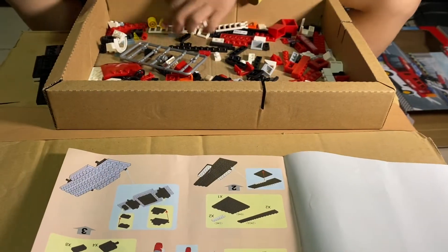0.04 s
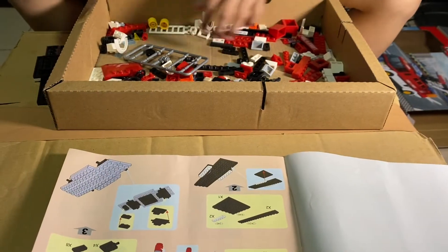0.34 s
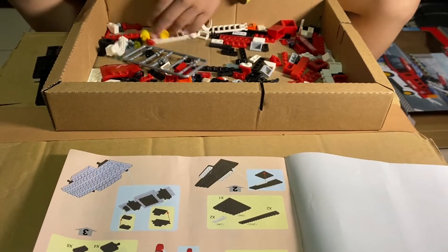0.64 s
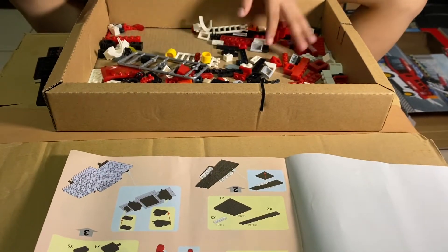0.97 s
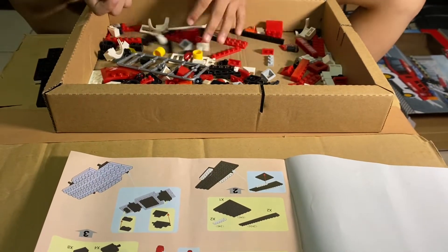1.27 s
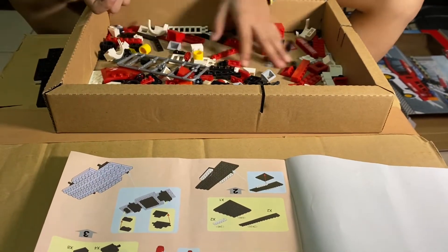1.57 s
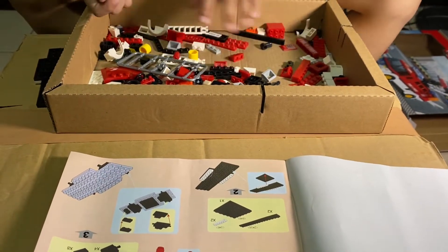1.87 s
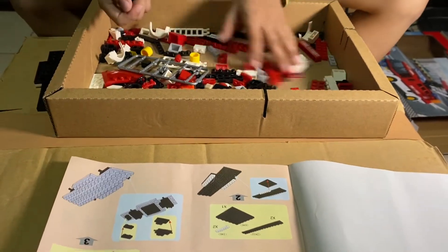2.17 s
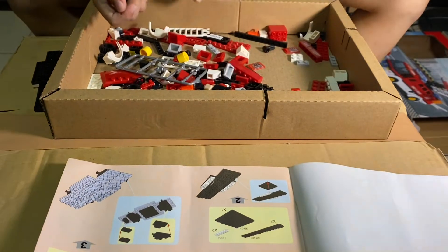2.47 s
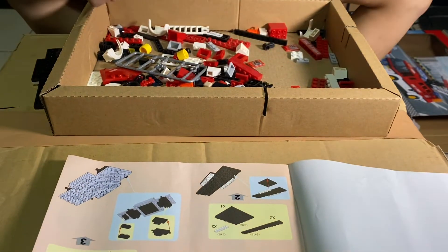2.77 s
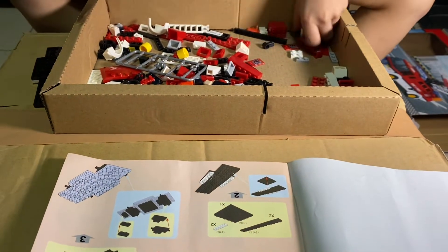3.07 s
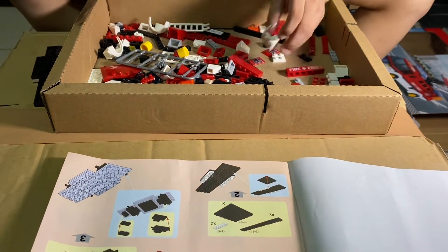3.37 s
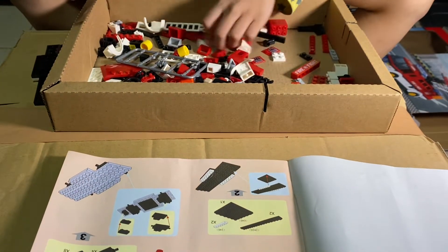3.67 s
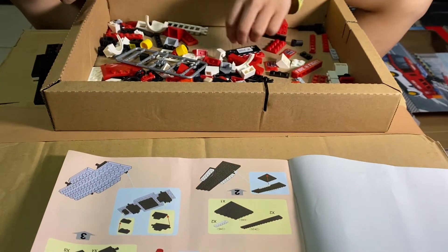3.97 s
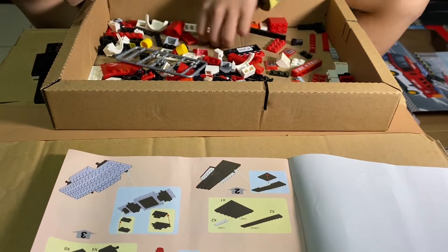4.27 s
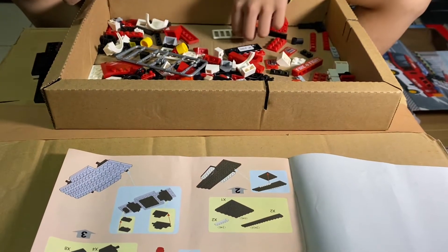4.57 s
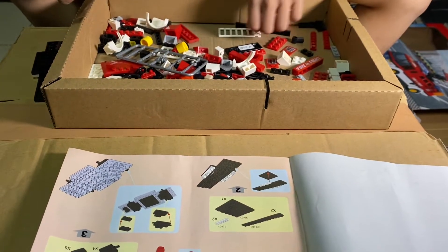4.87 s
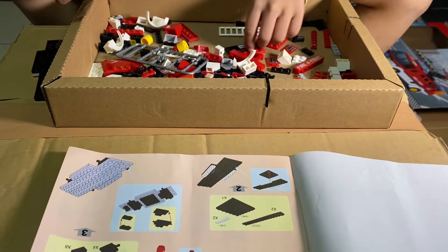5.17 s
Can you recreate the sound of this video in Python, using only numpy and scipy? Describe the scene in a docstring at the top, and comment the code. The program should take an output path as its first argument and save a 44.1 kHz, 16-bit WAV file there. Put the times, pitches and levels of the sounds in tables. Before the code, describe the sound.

A hand rummages through small plastic toy bricks in a cardboard box, making bursts of clicking, rattling and light knocks.

```python
"""A hand rummages through small plastic toy bricks in a shallow cardboard box, in a quiet room.
It starts with a run of short strokes: each contact clicks a brick and knocks the cardboard under it,
and a few small parts ring on. At 2.5 s the hand rests; at 3 s it drops onto the pile and stirs again.
From 4 s come weaker strokes, a firm knock and soft fingertip rubs, then one last tap just after 5 s.
Box walls and room answer throughout, heard through two close microphones."""
import sys
import numpy as np
from scipy import signal
from scipy.fft import rfft, irfft, next_fast_len
from scipy.io import wavfile

SR = 44100
rng = np.random.default_rng(int(sys.argv[2]) if len(sys.argv) > 2 else 0)


def digitize_waveform(pressure):
    """Quantize a signal to 16-bit integers and store it at the path in sys.argv[1].

    Rows of a 2-D input are taken as channels; values are limited to [-1, 1].
    """
    field = np.atleast_2d(pressure).T
    bounded = np.clip(field, -1, 1)
    quanta = np.round(bounded * 32767).astype(np.int16)
    wavfile.write(sys.argv[1], SR, quanta)


N = 230881

# The room's hush. Each row: frequency in Hz, level in dB.
HUSH_SPECTRUM = [(15, -34.5), (25, -14.5), (53, -7), (76, -9), (263, -24), (301, -16), (394, -22.5),
                 (1100, -30.5), (1400, -27.5), (1740, -34), (1940, -29.5), (2840, -38), (16000, -62.5)]
# The room's tail. Each row: frequency in Hz, t60 (time to fall 60 dB) in seconds.
ROOM_DECAY = [(150, 0.23), (500, 0.4), (1200, 0.34), (2700, 0.48), (7000, 0.35), (15000, 0.37)]
# The colour of the reverb. Each row: frequency in Hz, gain in dB.
REVERB_EQ = [(100, -3.5), (700, -4), (1300, 0.5), (2500, 4.5), (5000, -3.5), (9000, -6), (15000, -7)]
# The width of reverb and hush. Each row: frequency in Hz, left-right likeness (1 is mono).
DIFFUSE_LIKENESS = [(40, 0.86), (150, 0.91), (400, .8), (700, 1), (1200, 0.38), (1800, 0.14), (5500, 0.1),
                    (7500, 0.88), (15000, 0.93)]
# A fingertip brushes the cardboard. Each row: start and end in seconds, level in dB.
FINGER_RUBS = [(1.911, 1.989, -56), (2.923, 2.974, -71.5), (4.65, 4.699, -54.5), (4.702, 4.784, -56.5),
               (4.93, 4.939, -60)]
# Small parts bounce free and ring. Each row: start in seconds, pitch in Hz, level in dB, t60 in seconds.
RINGING_PARTS = [(0.276, 5940, -51.5, 0.38), (0.406, 5850, -45.5, .06), (0.560, 9900, -28.5, .04),
                 (0.579, 10340, -24, 0.022), (0.608, 10090, -27, 0.037), (1.08, 10350, -20.5, .03),
                 (1.195, 10230, -18.5, .025), (1.205, 10380, -18, 0.03), (1.228, 10450, -13.5, 0.026),
                 (1.339, 10400, -33, 0.022), (2.147, 7240, -23.5, 0.09), (3.125, 5500, -48.5, 0.7),
                 (4.737, 3890, -52, 0.15)]
# The cardboard floor's modes. Each row: pitch in Hz, level in dB, t60 in seconds.
FLOOR_MODES = [(119, -11, 0.058), (220, -4, 0.057), (300, -2.5, 0.056), (389.7, 1.5, 0.036),
               (495, -4, 0.023), (590, -3, .025), (696, -0.5, 0.037), (786, -3.5, 0.044),
               (1037, -1.5, 0.027), (1184, 0, 0.026), (1320, -3.5, 0.035)]
# The colour of a plastic click. Each row: frequency in Hz, gain in dB.
PLASTIC_EQ = [(600, -15), (1500, 0.5), (2200, 2), (3500, 1), (5000, -1.5), (6000, -6.5), (7300, -6),
              (9000, -10.5), (10400, -4.5), (11300, -12.5), (13500, -13), (15700, -16)]
# Single hard contacts. Each row: time in seconds, levels in dB of brick click, edge tick, cardboard
# knock and cardboard thump, then the rebound in dB relative to the landing.
HARD_HITS = [(0.023, -40.5, -72, -35.5, -37.5, -19), (0.128, -22.5, -30.5, -29, -39.5, -2.5),
             (0.19, -27.5, -37, -32.5, -40, -11), (0.275, -58, -39.5, -64, -55, -15),
             (0.303, -37, -54, -38, -41.5, -30), (0.348, -59, -38, -64, -58, -22),
             (0.441, -54, -61, -31, -35, -3), (0.465, -31, -57, -33.5, -41, -19),
             (0.529, -28.5, -41, -34.5, -50.5, -16.5), (0.58, -28, -36, -33, -43, -16),
             (0.685, -29.5, -45, -31, -28.5, -2.5), (0.823, -59, -62, -35, -44, -16.5),
             (0.87, -36.5, -50, -37.5, -35, -14), (0.961, -34.5, -38, -24.5, -41, -8.5),
             (1.067, -22, -20, -21.5, -39, -2.5), (1.117, -37, -40, -16.5, -38.5, -14),
             (1.132, -23.5, -31, -19.5, -38.5, 3), (1.251, -29.5, -28, -28.5, -32.5, -14.5),
             (1.305, -40.5, -60, -26, -55.5, -20), (1.42, -64, -53, -60, -50, -15),
             (1.54, -29.5, -48, -44, -44.5, -13.5), (1.587, -23.5, -40, -25.5, -42.5, -13.5),
             (1.618, -24, -31, -29, -41.5, 0.5), (2.003, -36, -42.5, -29, -32.5, 4),
             (2.094, -30, -31.5, -30.5, -35, -7.5), (2.142, -26.5, -29.5, -24.5, -27, -0.5),
             (2.17, -24, -38, -25.5, -24.5, -0.5), (2.259, -25.5, -35, -31, -43.5, -13.5),
             (2.286, -41, -54, -26, -35, -12), (2.303, -36, -61, -27, -32, -4),
             (2.463, -35.5, -50, -37.5, -46.5, -24), (2.498, -38, -50.5, -43, -54, -18),
             (3.007, -29.5, -38.5, -23, -33, -1.5), (3.027, -34.5, -45, -26, -34, -22),
             (3.054, -42, -47, -31, -53, -19), (3.089, -39, -41, -33.5, -57, -21),
             (3.114, -36.5, -35, -33, -50, 3), (3.138, -31.5, -29.5, -30.5, -54.5, -30),
             (3.235, -32, -34.5, -33, -48, -2.5), (3.263, -43, -41, -37, -54, -16),
             (3.416, -34, -36, -33, -32, 5), (3.46, -32, -45, -29.5, -34, -11),
             (3.561, -58, -53, -39.5, -53, -22), (3.573, -33, -46, -32.5, -25.5, -8),
             (3.59, -31.5, -54, -28, -36, -12), (3.672, -22.5, -20, -33.5, -30, -13),
             (3.844, -37.5, -47, -58, -55, -17), (3.865, -38.5, -46, -41, -38, -13.5),
             (3.903, -37, -56, -35.5, -36.5, -2.5), (4.123, -52, -54.5, -34.5, -32, -9),
             (4.186, -55, -60, -34.5, -25.5, -9), (4.209, -32, -37, -28, -30, -7.5),
             (4.384, -25, -35, -22.5, -25.5, -5.5), (4.737, -48.5, -66, -42.5, -46.5, -16),
             (5.134, -41.5, -60, -36, -40, -23.5)]
# Strokes of the hand; one that crests at once is the hand dropping onto the pile.
# Each row: start, crest and end in seconds, click level at the crest in dB, settling in dB per second,
# tick over click in dB, knock over click in dB, floor stiffness as an upward tilt in dB.
HAND_STROKES = [(0.031, 0.117, 0.37, -32, 116, -3.5, -3, -2.5),
                (0.432, 0.466, 0.52, -40, 110, -8, 2.5, -1.5),
                (0.51, 0.604, 1.4, -28.5, 69.5, -6, -2.5, -1.5),
                (0.952, 0.964, 0.98, -43, 150.5, -18, 0.5, 6),
                (0.979, 1.089, 1.438, -24.5, 69.5, -3, -0.5, -2),
                (1.5, 1.631, 1.77, -31.5, 130.5, -5, -1, 0),
                (2.001, 2.007, 2.065, -34.5, 18, -7, -4.5, 6.5),
                (2.075, 2.152, 2.52, -27.5, 87, -1.5, -2.5, -1.5),
                (3.006, 3.011, 3.24, -41.5, 29.5, -10, 2.5, 7),
                (3.414, 3.415, 3.555, -34.5, 115.5, -2, -0.5, -5.5),
                (3.561, 3.687, 3.95, -27, 103.5, -0.5, -1.5, -1),
                (4.113, 4.211, 4.4, -43.5, 33, -7.5, 4.5, -0.5), (4.53, 4.564, 4.65, -61, 32, -19, 14.5, 1),
                (5.133, 5.136, 5.4, -54.5, 150, -11, 1, -4.5)]
# Phase between the microphones. Each row: frequency in Hz, lead of the left in radians.
MIC_PHASE = [(0, 0), (700, .5), (1800, .1), (2900, 1.2), (3700, .2), (7000, 0), (7600, -.4), (9100, -3.1),
             (11300, -6.3), (13300, -9.4), (15000, -12.5), (16500, -12.6)]
# Balance between the microphones. Each row: frequency in Hz, left minus right in dB.
MIC_BALANCE = [(60, -1.5), (110, 0.5), (200, -0.5), (380, 0), (700, 4), (1290, 2.5), (2380, -1), (4400, 6),
               (8120, 0), (15000, 0)]

SWELL_DB_PER_S = 152.5  # the pile gets louder as the hand speeds up
TICK_GROWTH, KNOCK_GROWTH = 1.71, 0.86  # dB of edge tick and of cardboard knock per dB of effort
LIFT_S, LIFT_DB = 0.056, 5  # the hand lets go over the end of each stroke
REBOUND_S = 0.007  # a struck piece rocks and lands again
MAX_CONTACTS, TOP_HZ = 4000, 15900
T = np.arange(4096) / SR  # seconds within one contact


def amp(db):
    """Decibels to gain."""
    return 10 ** (np.asarray(db) / 20)


def along(points, hz):
    """A curve of (Hz, value) points, read on a log frequency axis."""
    freqs, values = np.transpose(points)
    return np.interp(np.log(hz + 1), np.log(freqs + 1), values)


def band(hz, lo, hi, order):
    """Gain of a band-pass."""
    return 1 / np.sqrt((1 + (lo / (hz + 1)) ** (2 * order)) * (1 + (hz / hi) ** (2 * order)))


def filtered(x, response):
    """Shape x with a frequency response."""
    size = next_fast_len(N + SR // 2)
    return irfft(rfft(x, size) * response(np.fft.rfftfreq(size, 1 / SR)), size)[..., :N]


def coloured(blows, gain):
    """Minimum-phase EQ for short sounds; each leaves with the energy of 5 ms at full level."""
    n = len(T)
    cepstrum = irfft(np.log(np.maximum(gain(np.fft.rfftfreq(n, 1 / SR)), 1e-5)))
    fold = np.r_[1, np.full(n // 2 - 1, 2), 1, np.zeros(n // 2 - 1)]
    shaped = irfft(rfft(blows) * np.exp(rfft(cepstrum * fold)))
    return shaped / np.linalg.norm(shaped, axis=-1, keepdims=True) * np.sqrt(.005 * SR)


def add(track, start_s, sound):
    """Mix a sound into the track."""
    start = int(np.clip(start_s * SR, 0, N - 1))
    track[start:start + len(sound)] += sound[:N - start]


def stroke_at(times):
    """The columns of the stroke last begun at each time."""
    rows = np.array(HAND_STROKES)
    return rows[np.maximum(np.searchsorted(rows[:, 0], times) - 1, 0)].T


def widened(pair):
    """Two unrelated signals become left and right, as alike as a diffuse field at the microphones."""
    turn = lambda hz: np.arccos(np.clip(along(DIFFUSE_LIKENESS, hz), -1, 1)) / 2
    mid, side = filtered(pair, lambda hz: np.array([np.cos(turn(hz)), np.sin(turn(hz))]))
    return np.array([mid + side, mid - side])


def room_tone(level_db):
    """The bed: the low, steady hush of the room."""
    noise = widened(rng.standard_normal((2, N)))
    hush = filtered(noise, lambda hz: amp(along(HUSH_SPECTRUM, hz)) * band(hz, 39, SR, order=3))
    return amp(level_db) * hush / hush.std()


def reverb(source, walls_db, walls_t60, tail_db, positions):
    """The box walls answer at once, the room after them; the paths change as the hand moves."""
    wet, knots = np.zeros((2, N)), np.linspace(0, N, positions)
    for k in range(positions):
        hz, t, noise = signal.stft(rng.standard_normal((2, SR // 2)), SR, nperseg=256)
        decay = amp(-60 * t / along(ROOM_DECAY, hz)[:, None])
        tail = signal.istft(noise * decay * (1 - np.exp(-t / 0.003)), SR)[1]
        t = np.arange(tail.shape[1]) / SR
        walls = rng.standard_normal(tail.shape) * amp(-60 * t / walls_t60) * (t > .0008)
        answer = amp(tail_db) * tail / np.linalg.norm(tail[0])
        answer += amp(walls_db) * walls / np.linalg.norm(walls[0])
        start, end = int(knots[max(k - 1, 0)]), int(knots[min(k + 1, positions - 1)])
        crossfade = np.sqrt(np.interp(np.arange(start, end), knots, np.arange(positions) == k))
        for track, response in zip(wet, answer):
            add(track, start / SR, signal.fftconvolve(source[start:end] * crossfade, response))
    return filtered(widened(wet), lambda hz: amp(along(REVERB_EQ, hz)))


def finger_rubs(lo_hz, hi_hz):
    """Skin sliding on cardboard: soft swells of midrange friction."""
    swells = np.zeros(N)
    friction = filtered(rng.standard_normal(N), lambda hz: band(hz, lo_hz, hi_hz, order=3))
    for start, end, db in FINGER_RUBS:
        add(swells, start, amp(db) * np.hanning(max(int((end - start) * SR), 2)))
    return swells * friction / friction.std()


def ringing_parts(trim_db, chatter):
    """A small free part rings while it chatters on its neighbours, which blurs its pitch."""
    track, t = np.zeros(N), np.arange(SR // 2) / SR
    for start, hz, db, t60 in RINGING_PARTS:
        blur = np.cumsum(rng.standard_normal(len(t))) * np.sqrt(2 * np.pi * chatter * hz / SR)
        add(track, start, amp(db + trim_db - 60 * t / t60) * np.sin(2 * np.pi * hz * t + blur))
    return track


def cardboard_knocks(lo_hz, hi_hz, count):
    """Knocks at many spots: the spot sets each mode's strength, the load of bricks shifts its pitch."""
    ring = np.zeros((count, len(T)))
    for hz, db, t60 in FLOOR_MODES:
        strength, shift = rng.standard_normal((2, count, 1))
        envelope = amp(db + 2.86 * abs(strength) - 60 * T / t60)
        ring += np.sign(strength) * envelope * np.sin(2 * np.pi * hz * (1 + 0.036 * shift) * T)
    scuff = 3.6 * rng.standard_normal(ring.shape) * amp(-60 * T / 0.019)
    return coloured(ring + scuff, lambda hz: band(hz, lo_hz, hi_hz, order=4))


def floor_stiffness(knocks, split_hz):
    """The floor is stiffer and sounds higher near the walls, so each stroke tilts its knocks' tone."""
    tilt = amp(stroke_at(np.arange(N) / SR)[-1])
    lower = filtered(knocks, lambda hz: band(hz, 0, split_hz, order=8))
    return (lower + tilt * (knocks - lower)) / np.sqrt((1 + tilt ** 2) / 2)


def brick_clicks(lo_hz, hi_hz, base_t60, crack, crack_t60, rise_s, count=128, modes=14):
    """Clicks of many pieces: a crack as the edges catch, then each piece's own heavily damped modes."""
    ring = np.zeros((count, len(T)))
    for _ in range(modes):
        hz = rng.uniform(lo_hz, hi_hz, (count, 1))
        t60 = base_t60 * rng.uniform(0.98, 1.42, (count, 1))
        ring += rng.uniform(-1, 1, (count, 1)) * np.sin(2 * np.pi * hz * T) * amp(-60 * T / t60)
    snap = crack * rng.standard_normal(ring.shape) * amp(-60 * T / crack_t60)
    clicks = (ring + snap) * (1 - np.exp(-T / rise_s))
    return coloured(clicks, lambda hz: amp(along(PLASTIC_EQ, hz)) * band(hz, lo_hz, hi_hz, order=5))


def contacts(voice, times, levels_db):
    """Each contact fires a random sound from the voice's bank, radiating unevenly to left and right."""
    bank, scatter_db = voice
    pair = np.zeros((2, N))
    picks = rng.integers(len(bank), size=MAX_CONTACTS)
    pans_db = scatter_db * rng.standard_normal(MAX_CONTACTS)
    for start, db, pick, pan_db in zip(times, levels_db, picks, pans_db):
        add(pair[0], start, amp(db + pan_db / 2) * bank[pick])
        add(pair[1], start, amp(db - pan_db / 2) * bank[pick])
    return pair


def hard_hits(voices, trims_db, graze_db, max_graze_s):
    """Pieces drop or snap on each other and the box: a corner grazes, the face lands, then rebounds."""
    times, *levels, rebound_db = np.transpose(HARD_HITS)
    grazes = times - max_graze_s * rng.uniform(0.44, 1, len(times))
    touches = np.r_[grazes, times, times + REBOUND_S]
    return np.array([contacts(voice, touches, trim + np.r_[db + graze_db, db, db + rebound_db])
                     for voice, db, trim in zip(voices, levels, trims_db)])


def rummage(voices, trims_db, contacts_per_s, spread_db, seat_db, corner_db):
    """Pieces jostle as each stroke swells and settles; their edges tick most when pushed hard."""
    slip, force, seat, corner = rng.random((4, MAX_CONTACTS))
    times = (np.arange(MAX_CONTACTS) + 2 * slip) / contacts_per_s
    start, crest, end, crest_db, settling, tick_over_db, knock_over_db, _ = stroke_at(times)
    moving = (start < times) & (times < end)
    effort_db = np.minimum(SWELL_DB_PER_S * (times - crest), settling * (crest - times))
    effort_db -= LIFT_DB * np.clip(1 - (end - times) / LIFT_S, 0, 1)
    touch_db = crest_db + spread_db * (force ** 2.56 - 1)  # many light touches, few hard ones
    click_db = touch_db + effort_db
    # A corner ticks more than a flat face; a piece lying on the floor knocks it harder.
    tick_db = touch_db + tick_over_db + TICK_GROWTH * effort_db + corner_db * (corner - .5)
    knock_db = touch_db + knock_over_db + KNOCK_GROWTH * effort_db + seat_db * (seat - .5)
    levels = click_db, tick_db, knock_db, knock_db  # the thump follows the knock
    return np.array([contacts(voice, times[moving], db[moving] + trim)
                     for voice, db, trim in zip(voices, levels, trims_db)])


def scene():
    """The mix: bricks and box up close, their reverb behind, the hush underneath."""
    click = brick_clicks(1444, 7895, base_t60=0.012, crack=3.6, crack_t60=0.017, rise_s=0.00018)
    tick = brick_clicks(7670, 16570, base_t60=0.011, crack=3.2, crack_t60=0.015, rise_s=0.0003)
    knock = cardboard_knocks(lo_hz=537, hi_hz=1580, count=64)
    thump = cardboard_knocks(lo_hz=70, hi_hz=463, count=64)
    # A contact's four voices, each with its left-right scatter in dB; the trims follow this order.
    voices = (click, 4), (tick, 3), (knock, 2.2), (thump, .6)
    stirred = rummage(voices, trims_db=(1.02, 2.1, 1.57, -4.5), contacts_per_s=380,
                      spread_db=11, seat_db=9, corner_db=11.5)
    struck = hard_hits(voices, trims_db=(-3.5, -2.1, -0.5, -1.47), graze_db=-20, max_graze_s=0.0034)
    clicks, ticks, knocks, thumps = stirred + struck
    rubs = finger_rubs(lo_hz=639, hi_hz=1237)
    pile = clicks + ticks + floor_stiffness(knocks, split_hz=760) + thumps + rubs
    ringing = ringing_parts(trim_db=1.5, chatter=0.012)
    send = pile.mean(axis=0) + amp(-5) * ringing
    wet = reverb(send, walls_db=-4, walls_t60=0.013, tail_db=-5.5, positions=24)
    return pile + ringing + wet + room_tone(level_db=-58)


def record(dry):
    """A camera's two close microphones differ in phase and level; a steep cut takes off the very top."""
    def response(hz):
        sides = np.array([[.5], [-.5]])
        lead = np.interp(hz, *np.transpose(MIC_PHASE))
        balance = amp(along(MIC_BALANCE, hz) * sides)
        return balance * np.exp(1j * lead * sides) * band(hz, 0.73, TOP_HZ, order=80)
    return filtered(dry, response)


dry = scene()
out = record(dry)
digitize_waveform(out)
```